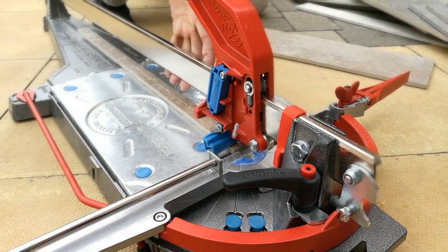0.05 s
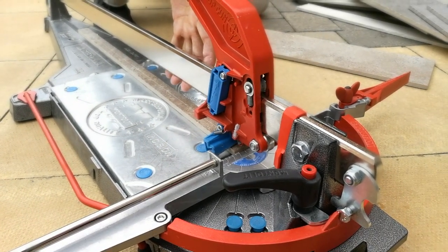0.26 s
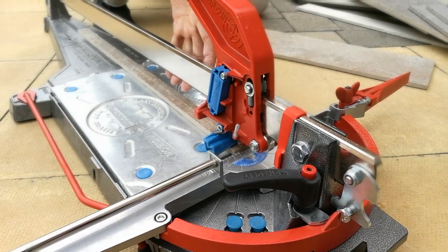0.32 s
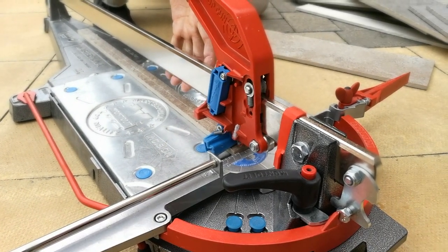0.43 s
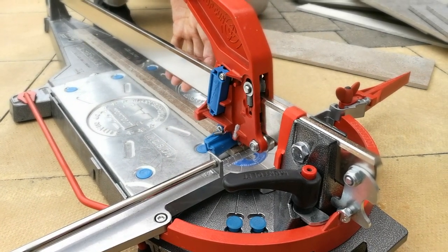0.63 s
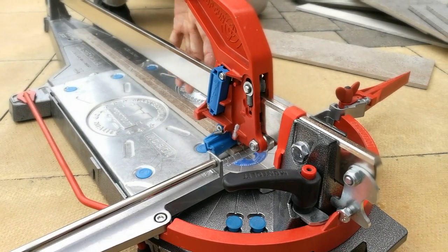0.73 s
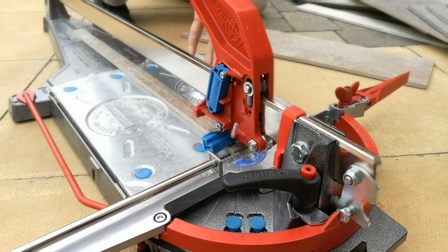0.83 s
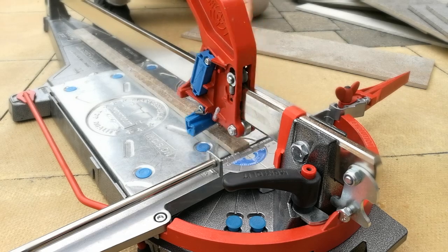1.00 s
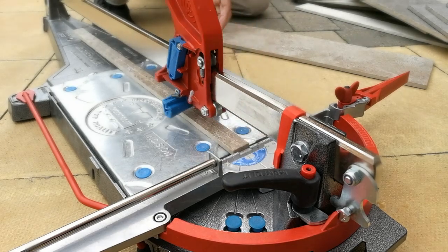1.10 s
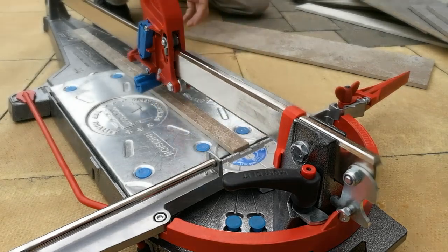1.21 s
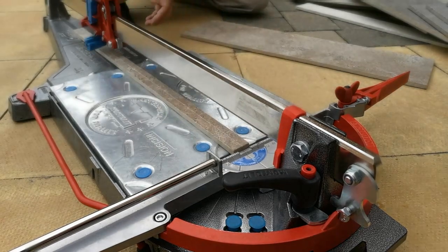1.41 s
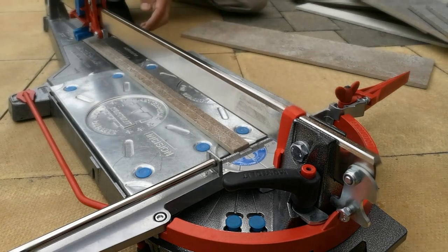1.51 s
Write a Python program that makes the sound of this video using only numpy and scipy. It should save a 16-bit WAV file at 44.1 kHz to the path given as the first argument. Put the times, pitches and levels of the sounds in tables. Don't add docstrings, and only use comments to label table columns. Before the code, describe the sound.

A hard, bright snap rattles the sprung metal bed and thumps the base; a few small clinks follow, then rollers sing and scrape gritty along a steel rail before stopping softly, close stereo microphone outdoors.

```python
import sys
import numpy as np
from scipy import signal
from scipy.fft import rfft, irfft, next_fast_len
from scipy.io import wavfile
from scipy.ndimage import uniform_filter1d, map_coordinates

SR = 44100
rng = np.random.default_rng(int(sys.argv[2]) if len(sys.argv) > 2 else 0)


def transcribe(signal):
    frames = np.atleast_2d(signal).T
    limited = np.clip(frames, -1, 1)
    pcm = np.round(limited * 32767).astype(np.int16)
    wavfile.write(sys.argv[1], SR, pcm)


def volts_from_db(level):
    exponent = np.asarray(level, float) / 20
    return 10 ** exponent


N = 68355


def unit(x):
    return x / np.sqrt(np.mean(x ** 2) + 1e-20)


def along(points, hz):
    f, v = np.transpose(points)
    return np.interp(np.log(hz + 1), np.log(f + 1), v)


def curves(rows):
    s, *cols = np.transpose(rows)
    return [np.interp(np.arange(N) / SR, s, c) for c in cols]


def noise():
    return rng.standard_normal((2, N))


def wobble(rate):
    return map_coordinates(rng.standard_normal(N // 8), [np.arange(N) * rate / SR])


def filtered(x, response):
    m = next_fast_len(N + SR // 2)
    return irfft(rfft(x, m) * response(np.fft.rfftfreq(m, 1 / SR)), m)[..., :N]


def coloured(x, spectrum):
    return filtered(x, lambda hz: unit(volts_from_db(along(spectrum, hz))))


def mode(f, centre, width, db):
    return volts_from_db(db) * 1j * f * width / (centre * centre - f * f + 1j * f * width)


def resonant(x, peaks):
    def response(f):
        h = sum((-1) ** k * mode(f, *peak) for k, peak in enumerate(peaks))
        return unit(abs(h)) * np.exp(1j * np.angle(h))
    return filtered(x, response)


def travelling(x, peaks, place):
    centre, width, db, first, spacing = np.transpose(peaks)[:, :, None, None]
    sign = (-1) ** np.arange(len(peaks))[:, None, None]

    def response(f):
        h = sign * mode(f, centre, width, db)
        return h / np.sqrt(np.mean(abs(h.sum(0)) ** 2))
    swing_db = 5.5 * np.cos(2 * np.pi * (place - first) / spacing)
    return (filtered(x, response) * volts_from_db(swing_db)).sum(0)


def patchy(x):
    z = signal.stft(x, nperseg=256)[2]
    field = uniform_filter1d(rng.standard_normal(z.shape[1:]), 3, 0)
    field = uniform_filter1d(field, 10, 1)
    return signal.istft(z * volts_from_db(2.8 * unit(field)), nperseg=256)[1][:, :N]


# frequency in Hz, time to fall 60 dB in seconds.
RINGING_TIMES = [(300, 0.29), (1000, 0.3), (2500, 0.19), (5000, 0.14), (12000, 0.088)]


def tail(x):
    hz, t, z = signal.stft(rng.standard_normal((2, SR // 2)), SR, nperseg=128)
    fall_db = -60 * t / along(RINGING_TIMES, hz)[:, None]
    z = z * (volts_from_db(fall_db) + volts_from_db(-30.5 + fall_db / 3))
    h = signal.istft(z, SR, nperseg=128)[1]
    return signal.fftconvolve(x[None], h / np.linalg.norm(h[0]), axes=1)[:, :N]


# frequency in Hz, likeness from 0 to 1.
LIKENESS = [(300, 0.85), (700, 0.83), (1400, 0.91), (3000, 0.5), (6000, 0.22)]
# frequency in Hz, phase lead in radians.
LEFT_LEAD = [(100, 0.1), (400, 1.91), (800, 2.74), (1500, 0.38), (3000, 1.19), (10000, 1.03)]


def ports(pair, lean):
    lag_s = 0.00018

    def blend(hz):
        turn = np.arccos(np.clip(along(LIKENESS, hz), 0, 1)) / 2
        return np.array([np.cos(turn), np.sin(turn)])

    def sides(hz):
        phase = along(LEFT_LEAD, hz) - 2 * np.pi * hz * lag_s
        left = volts_from_db(along(lean, hz) / 2) * np.exp(.5j * phase)
        return np.array([left, 1 / left])
    shared, different = filtered(pair, blend)
    return filtered(np.array([shared + different, shared - different]), sides)


# time in seconds, rumble level in dB, floor level in dB.
WIND_LEVELS = [(0, -75, -51), (.06, -65.5, -66.5), (.13, -57, -95), (.19, -68, -94.5), (.45, -70.5, -83.5),
               (.6, -82.5, -65.5), (1.1, -87, -58), (1.55, -78, -73)]
# frequency in Hz, strength in dB per Hz.
WIND_COLOUR = [(20, -6), (60, 0), (120, -3), (250, -22.5)]
# frequency in Hz, strength in dB per Hz.
FLOOR_COLOUR = [(100, -22), (300, -1.5), (1500, 0.5), (3600, -19), (5000, -29), (12000, -37.5)]


def air():
    wind_db, floor_db = curves(WIND_LEVELS)
    shared, different = coloured(noise(), list(WIND_COLOUR) + [(400, -120)])
    rumble = shared + .25 * different * [[1], [-1]]
    rumble = rumble * volts_from_db(wind_db + 3 * wobble(20))
    return rumble + volts_from_db(floor_db) * coloured(noise(), FLOOR_COLOUR)


def base():
    push_s, rise_s, hold_s, hum_hz = 0.0081, 0.015, 0.12, 164
    t = np.clip(np.arange(N) / SR - .2185, 0, None)
    push = volts_from_db(-31.5) * t / push_s * np.exp(-(t / push_s) ** 2)
    swell = (1 - np.exp(-t / rise_s)) * np.exp(-(t / hold_s) ** 4)
    return push + volts_from_db(-52.5) * swell * np.sin(2 * np.pi * hum_hz * t)


# frequency in Hz, left minus right in dB.
CONTACT_LEAN = [(60, 3), (130, 3.5), (290, 2), (640, -7), (1410, -8.5), (3100, 5), (6820, -6.5),
                (15000, -15)]


def rattle(contacts, modes, body, bright):
    s, db, bright_db, length = np.transpose(contacts)[:, :, None]
    attack_s, damping = .0007, .6
    u = (np.arange(N) / SR - s) / length
    shape = np.clip(u * length / attack_s, 0, 1) * np.exp(-np.clip(u, 0, 9) ** 2)
    force = noise() * volts_from_db(2 * wobble(900))
    low = force * (volts_from_db(db) * shape).sum(0)
    high = force * (volts_from_db(db + bright_db - 7.5) * shape).sum(0)
    crack = coloured(low, body) + coloured(high, bright)
    ring = resonant(low, [(hz, 2.2 / (t60 * damping), mode_db) for hz, mode_db, t60 in modes])
    return ports(crack + volts_from_db(0.5) * ring + volts_from_db(-7.5) * tail(crack[0]), CONTACT_LEAN)


# start in seconds, level in dB, brightness in dB, rattle length in seconds.
STOP_CONTACTS = [
    (1.415, -47, -12, 0.022),
]
# frequency in Hz, level in dB, time to fall 60 dB in seconds.
FRAME_MODES = [(533, -9, .35), (646, -1, .3), (807, -5, .4), (1050, -6, .45), (1600, -5, 0.37),
               (1820, -9, .4), (1900, -6, .4), (2420, -13, .3), (2660, -10, .3), (3580, -1, .3)]
# frequency in Hz, strength in dB per Hz.
KNOCK_COLOUR = [(150, -31), (250, -20.5), (1100, -15), (1530, -13), (1840, -2.5), (3600, -20), (4300, -34),
                (8800, -120)]
# frequency in Hz, strength in dB per Hz.
CRACK_BRIGHT = [(1800, -32.5), (3000, -17), (3570, -2), (4300, -5.5), (5300, -1), (7000, -8),
                (10400, -14.5), (16000, -26.5)]


def stop():
    return rattle(STOP_CONTACTS, FRAME_MODES, KNOCK_COLOUR, CRACK_BRIGHT)


# start in seconds, level in dB, brightness in dB, rattle length in seconds.
LANDING_CONTACTS = [
    (.6378, -43, 8, 0.0065),
]
# frequency in Hz, level in dB, time to fall 60 dB in seconds.
CARRIAGE_MODES = [(535, -19, 0.076), (836, 5, 0.12), (1015, 2, 0.23), (1700, 7, .12), (1890, 7, 0.23),
                  (2480, -6, .15), (2930, -1, .08), (4900, -2, .08), (5440, -16, 0.09)]


def landing():
    return rattle(LANDING_CONTACTS, CARRIAGE_MODES, KNOCK_COLOUR, CRACK_BRIGHT)


# start in seconds, level in dB, brightness in dB, rattle length in seconds.
LIFT_CONTACTS = [
    (.4935, -39.5, -21.5, 0.01),
    (.512, -81, 23, 0.012),
    (.5245, -71.5, 15, 0.032),
    (.5365, -44.5, -26, 0.0071),
    (.546, -58, 2.5, 0.011),
    (.5555, -51, 1.5, 0.015),
]
# frequency in Hz, level in dB, time to fall 60 dB in seconds.
LEVER_MODES = [(550, 2.5, 0.38), (857, 3, 0.19), (1104, -6, 0.11), (1633, 5.5, 0.198), (1660, -3, 0.3),
               (2220, -20, 0.17), (2517, -2.5, 0.097), (2440, 5.5, 0.3), (3080, -15.5, 0.13),
               (3170, -8, 0.2), (3480, -5.5, 0.2)]
# frequency in Hz, strength in dB per Hz.
CLINK_BRIGHT = [(2500, -27), (3500, 5), (6000, -7.5), (12000, -9), (16000, -20.5)]


def lift():
    return rattle(LIFT_CONTACTS, LEVER_MODES, KNOCK_COLOUR, CLINK_BRIGHT)


# start in seconds, level in dB, brightness in dB, rattle length in seconds.
SNAP_CONTACTS = [(-.004, -42.5, 10.5, 0.014), (.094, -82.5, 12, 0.0032), (.2002, -21.5, 10.5, 0.015),
                 (.213, -21.5, -10.5, 0.0047), (0.2185, -14.5, -3, 0.0074), (0.2235, -11.5, 6, 0.0056),
                 (0.2335, -23.5, 0, 0.0036), (0.2535, -24, 8.5, 0.006), (0.283, -33.5, -1, 0.009),
                 (0.291, -31.5, -6, 0.01), (.322, -41.5, -13.5, 0.026), (0.346, -47, -20, 0.013),
                 (0.379, -49.5, -29, 0.0086)]
# frequency in Hz, level in dB, time to fall 60 dB in seconds.
BED_MODES = [(527.6, -5, 0.062), (633, 2.5, 0.05), (1112, 2.5, 0.1), (1099.3, -4, 0.5), (1903, -2.5, 0.54),
             (1670, 9, 0.18), (1772, 4.5, 0.058), (2055, 7, 0.16), (2530, 4, 0.12), (2670, 1, 0.63),
             (3000, -13.5, 0.29), (2905, -9.5, 0.21), (3530, 2.5, 0.12), (5120, -7, 0.066)]
# frequency in Hz, strength in dB per Hz.
CRACK_DULL = [(150, -34), (250, -18.5), (550, -7.5), (1080, -11.5), (1300, -13), (2570, 0.5), (4000, -16),
              (5200, -36.5), (8800, -120)]


def snap():
    return rattle(SNAP_CONTACTS, BED_MODES, CRACK_DULL, CRACK_BRIGHT)


# time in seconds, pitch in Hz, level in dB.
ROLLER_SONG = [(.66, 460, -51.5), (.736, 520.8, -36), (0.757, 527.4, -49), (.79, 596.8, -41.5),
               (.876, 1274, -39), (.915, 1410, -27), (.94, 1580, -39.5), (.99, 1790, -43),
               (1.014, 1938, -32), (1.042, 2080, -29.5), (1.084, 2025, -26), (1.138, 1680, -43),
               (1.174, 1560, -42), (1.2, 1320, -36), (1.262, 1030, -30.5), (1.302, 835, -42),
               (1.352, 805, -33.5), (1.43, 565, -41)]
# time in seconds, level in dB, grit brightness in dB.
RAIL_PRESSURE = [(.646, -50.5, -13), (.67, -53, -13.5), (.745, -56.5, -11.5), (.8, -45, -14.5),
                 (.88, -46, -3.5), (.9, -43, -1.5), (.96, -42.5, -3), (1.04, -41, 0.5), (1.16, -43, -1),
                 (1.24, -46, -2.5), (1.285, -48.5, 2.5), (1.33, -47, -6.5), (1.415, -47, -7),
                 (1.44, -55.5, -11), (1.55, -90.5, 2)]
# time in seconds, extra level in dB.
RAIL_JOLTS = [
    (.9, 3),
    (.942, 3.5),
    (1.05, 1),
    (1.14, 2.5),
    (1.285, 4),
    (1.415, 3.5),
]
# frequency in Hz, width in Hz, level in dB, then the first antinode
RAIL_MODES = [(557, 73, -10.5, 0.19, 0.18), (667, 18, -4.5, 0.044, 0.96), (819, 26.4, -6, .6, 0.32),
              (1043, 26.3, 4, 0.41, 0.44), (1170, 44, -10, .1, 0.84), (1333, 7.4, -5, 0.067, 0.68),
              (1592.5, 22, 2, 0.25, 0.6), (1669, 25.6, -3, .9, .6), (1764, 28, 1.5, .3, 0.36),
              (1928.5, 32, 2, 0.039, 0.794), (2460, 18, 4, .3, 0.56), (2617, 17, -6.5, 0.28, 0.4),
              (2940, 22, -7.5, 0.41, 0.58)]
HEAD_MODES = [(3620, 43, 1, 0.62, 0.2), (4120, 64, 13, 0.35, 0.81), (4910, 61, 10.5, 0.27, .22),
              (5085, 90, 9, 0.248, 0.48), (5400, 37, -15, 0.11, 0.37), (6140, 53, 0, 0.2, 0.27),
              (7034, 55, 5.5, .3, 1), (8600, 56, -34, 0.37, .5), (10720, 120, -9, 0.73, 0.43),
              (14200, 200, -27, .5, 0.87)]
# frequency in Hz, strength in dB per Hz.
RUB_COLOUR = [(180, -54), (300, -31.5), (527, 1), (1050, -10), (1940, 1.5), (4000, -23), (5200, -25.5),
              (8800, -120)]
# frequency in Hz, strength in dB per Hz.
GRIT_COLOUR = [(1760, -30), (3000, -6.5), (7150, -10.5), (14600, -32), (16000, -45)]
# frequency in Hz, left minus right in dB.
RAIL_LEAN = [(60, 0.5), (130, 0.5), (290, -0.5), (640, -7), (1410, -7), (3100, 4.5), (6820, -5),
             (15000, -17.5)]


def rolling_head():
    top_hz, land_s, jolt_s = 2250, .638, 0.0076
    t = np.arange(N) / SR
    hz, tone_db = curves([(.65, ROLLER_SONG[0][1], -100)] + list(ROLLER_SONG) + [(1.47, 485.4, -95)])
    slowness = 2 - hz / top_hz
    place = np.cumsum(hz * (tone_db > -80))
    place = place / place[-1]

    shaky_hz = hz + .005 * (hz + top_hz / 2) * wobble(250)
    phase = 2 * np.pi * np.cumsum(shaky_hz) / SR
    tone = np.sqrt(2) * volts_from_db(tone_db + 2.3 * slowness * wobble(90))
    first, second = tone * np.sin([phase, 2 * phase])
    song = first + volts_from_db(-3) * second * np.exp(-((2 * hz - 1950) / 420) ** 2)
    through_rail = resonant(volts_from_db(9.5 - 22) * song, [row[:3] for row in RAIL_MODES])
    song = (0.53 * song + through_rail) * [[1], [.2]]

    level_db, bright_db = curves([(land_s, -54, -28.5)] + list(RAIL_PRESSURE))
    level_db = np.where(t < land_s, -140, level_db)
    for s, db in RAIL_JOLTS:
        bright_db = bright_db + db * np.exp(-((t - s) / jolt_s) ** 2)
    grains = unit(noise() * volts_from_db(1.5 * wobble(700)))
    force = patchy(grains * volts_from_db(level_db + wobble(45.23)))
    grit = patchy(grains * volts_from_db(level_db + bright_db + 1.1 * wobble(130)))
    hiss = coloured(grit, GRIT_COLOUR) + volts_from_db(-3) * travelling(grit, HEAD_MODES, place)

    deep = travelling(force * volts_from_db(0.5 * slowness), RAIL_MODES[:5], place)
    rail = deep + travelling(force, RAIL_MODES[5:], place)
    near = volts_from_db(7.5 - 5) * rail + volts_from_db(5) * coloured(force, RUB_COLOUR) + hiss
    to_yard = near[0] - (1 - .35) * hiss[0] + 0.68 * song[0]
    wet = near + song + volts_from_db(-10.5) * tail(to_yard)
    return ports(filtered(wet, lambda f: 1 - 1 / (1 + (f / 360) ** 6)), RAIL_LEAN)


def scene():
    contacts = snap() + lift() + landing() + stop()
    return air() + base() + contacts + rolling_head()


def top_cut(x):
    return signal.sosfilt(signal.butter(12, 16000, fs=SR, output="sos"), x)


def record(dry):
    ceiling, top_hz = .9, 15500
    soft = dry / (1 + abs(dry / ceiling) ** 3) ** (1 / 3)
    mix = filtered(soft, lambda hz: 1 / (1 + (hz / top_hz) ** 60))
    return top_cut(mix)


dry = scene()
out = record(dry)
transcribe(out)
```